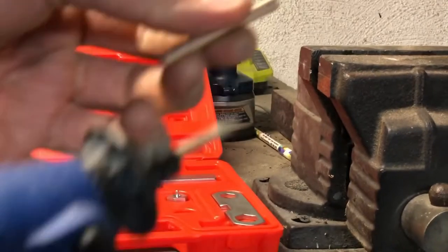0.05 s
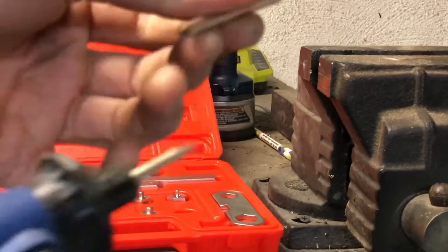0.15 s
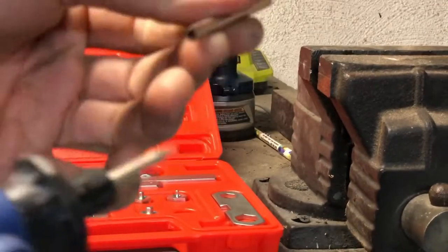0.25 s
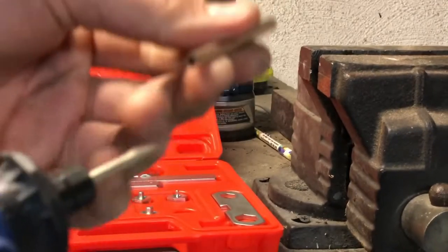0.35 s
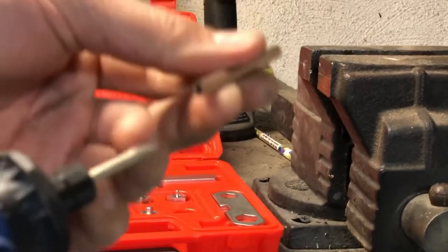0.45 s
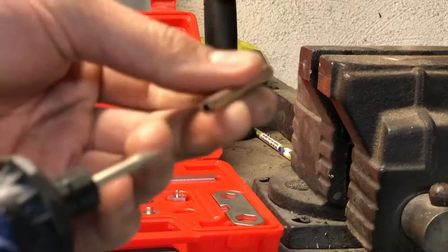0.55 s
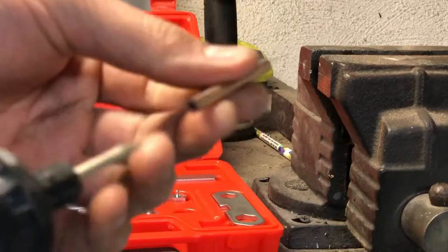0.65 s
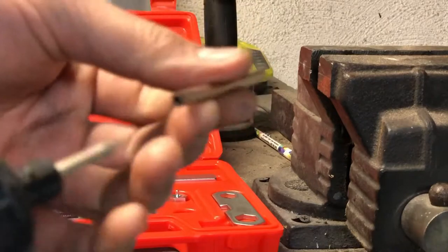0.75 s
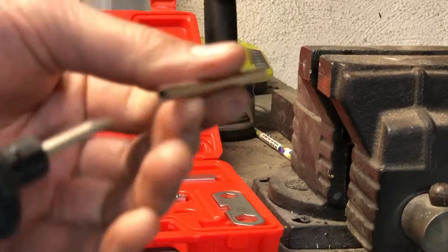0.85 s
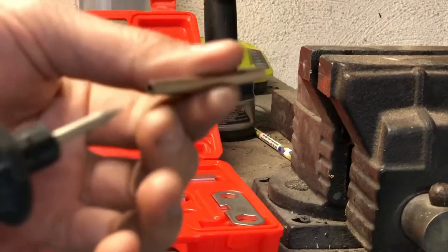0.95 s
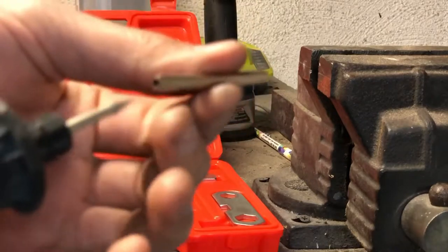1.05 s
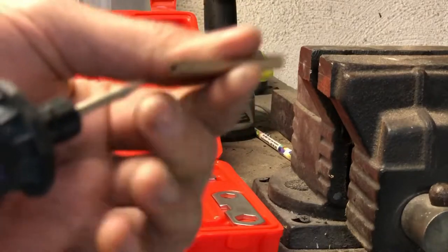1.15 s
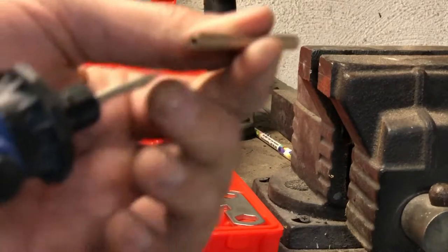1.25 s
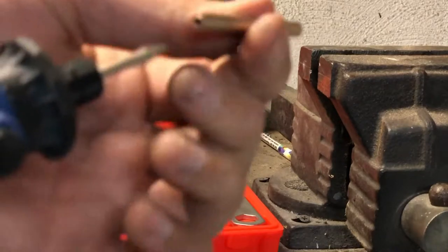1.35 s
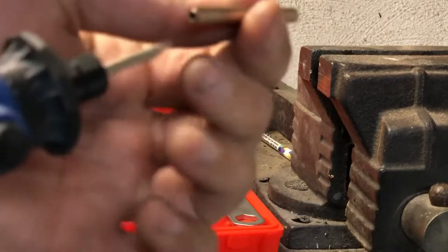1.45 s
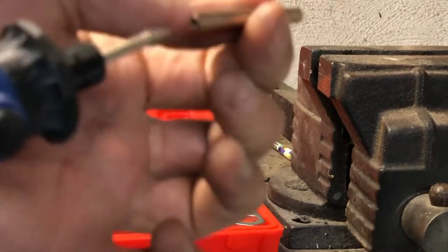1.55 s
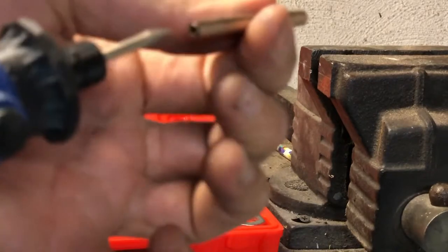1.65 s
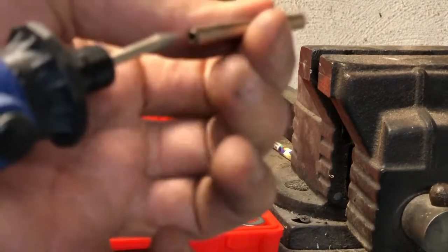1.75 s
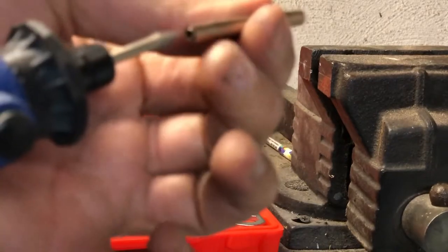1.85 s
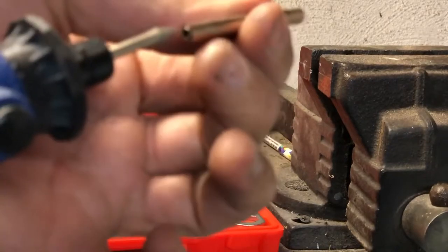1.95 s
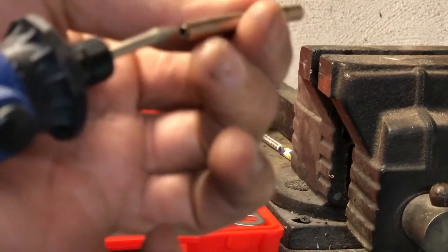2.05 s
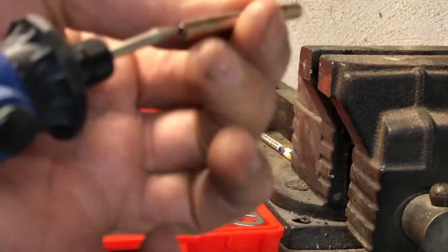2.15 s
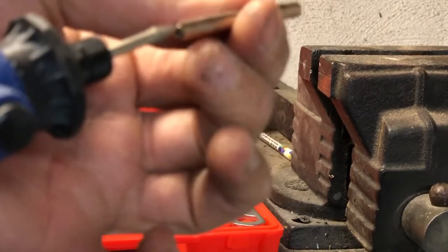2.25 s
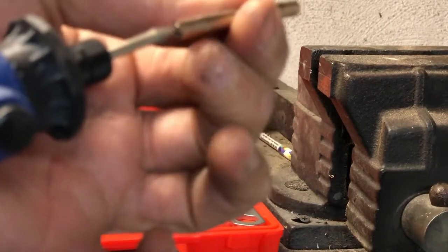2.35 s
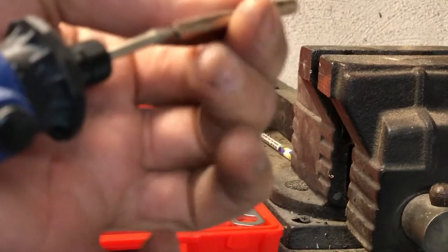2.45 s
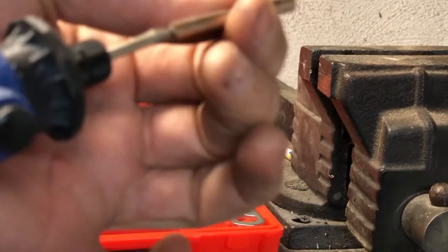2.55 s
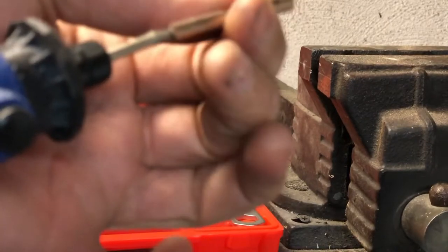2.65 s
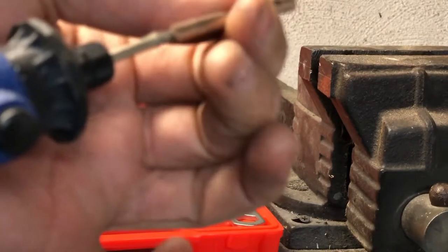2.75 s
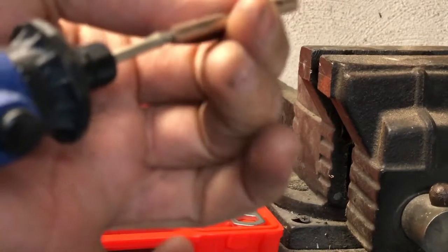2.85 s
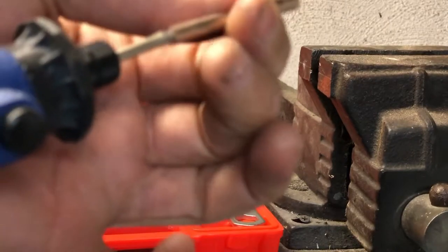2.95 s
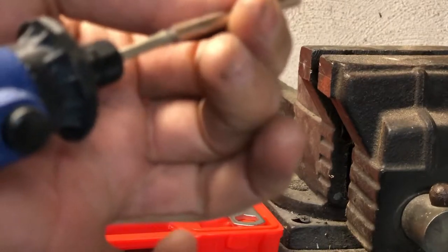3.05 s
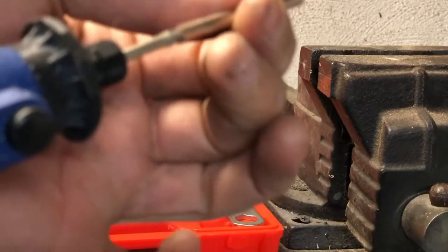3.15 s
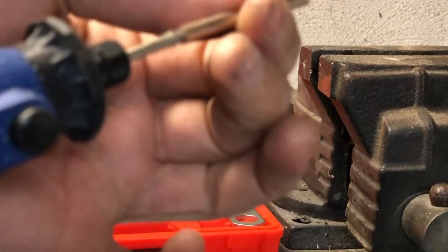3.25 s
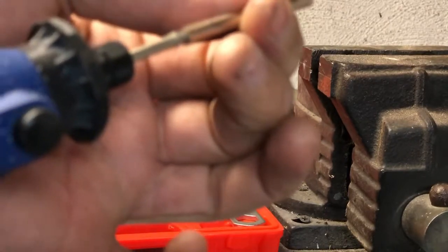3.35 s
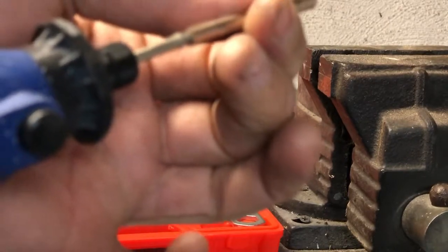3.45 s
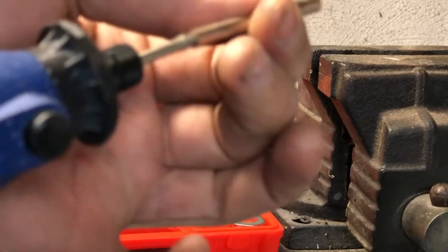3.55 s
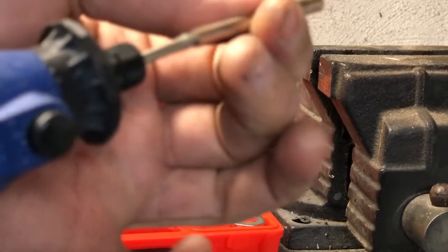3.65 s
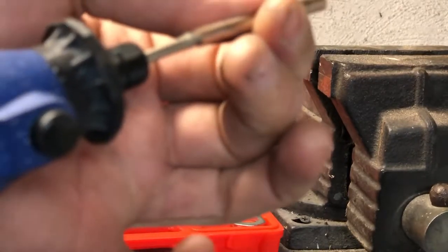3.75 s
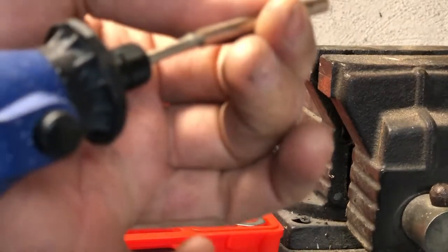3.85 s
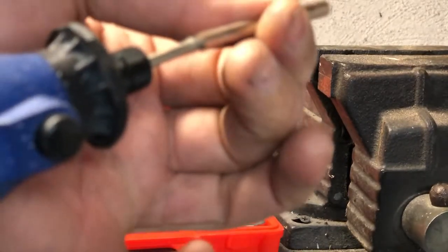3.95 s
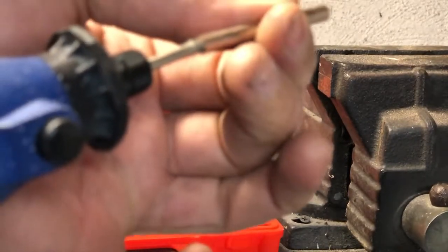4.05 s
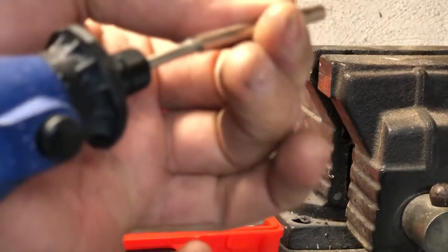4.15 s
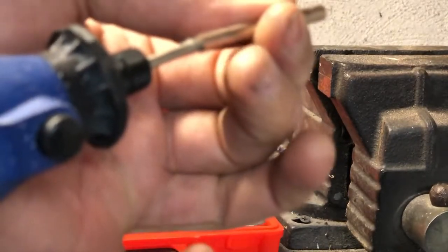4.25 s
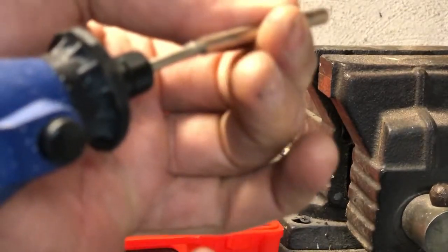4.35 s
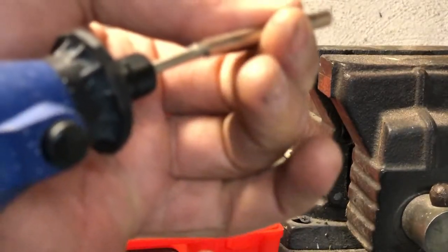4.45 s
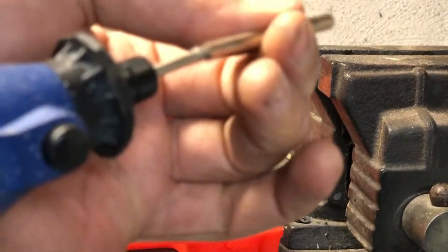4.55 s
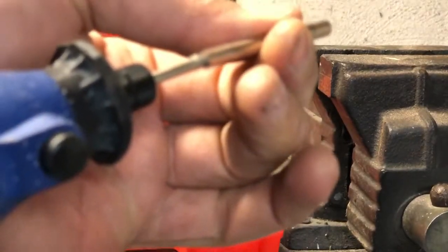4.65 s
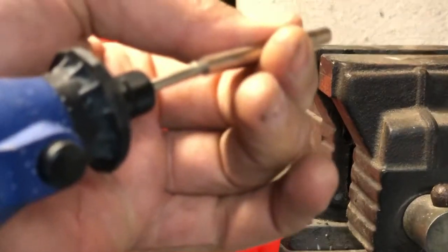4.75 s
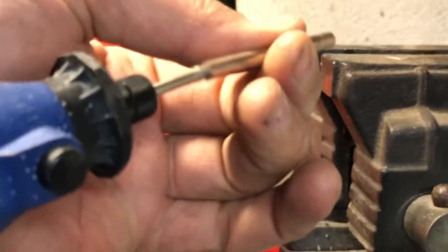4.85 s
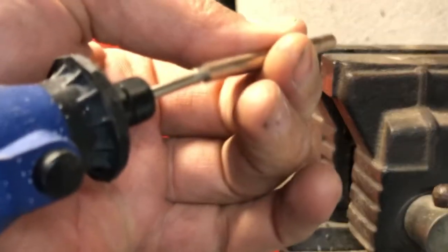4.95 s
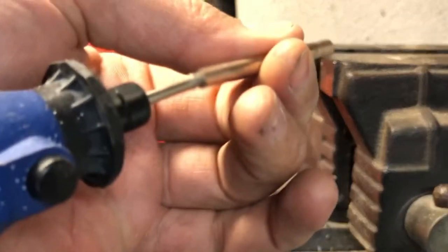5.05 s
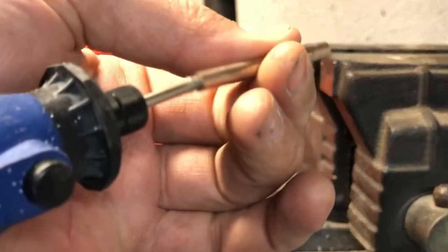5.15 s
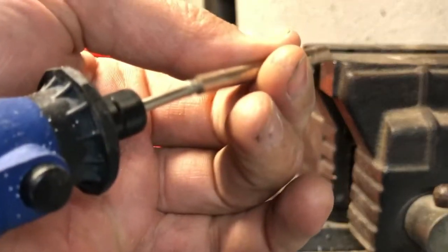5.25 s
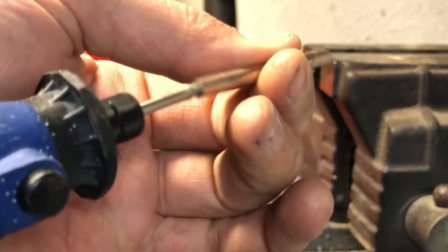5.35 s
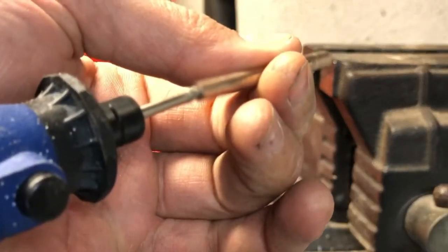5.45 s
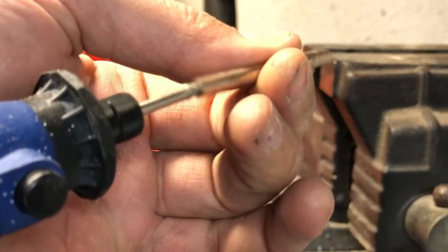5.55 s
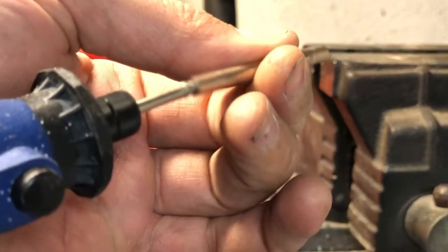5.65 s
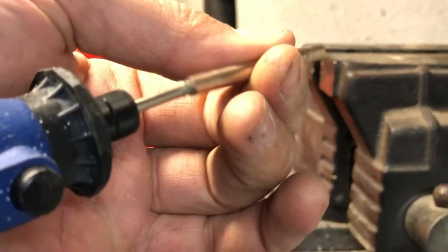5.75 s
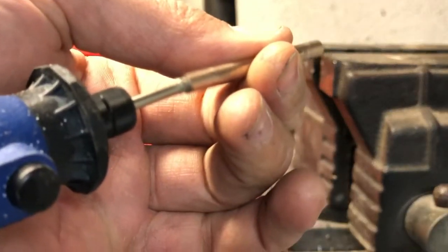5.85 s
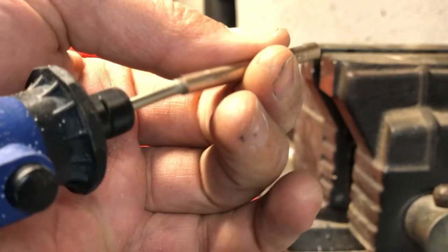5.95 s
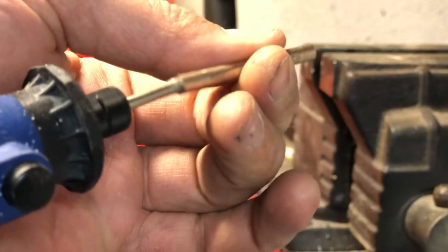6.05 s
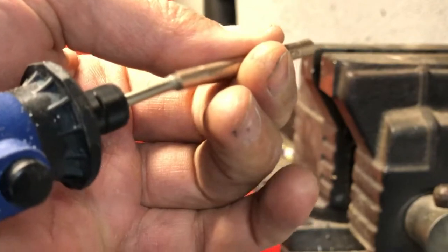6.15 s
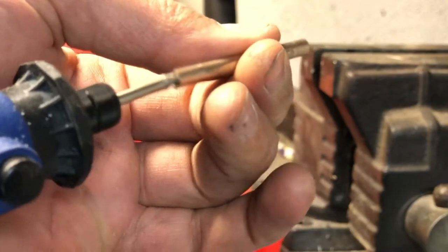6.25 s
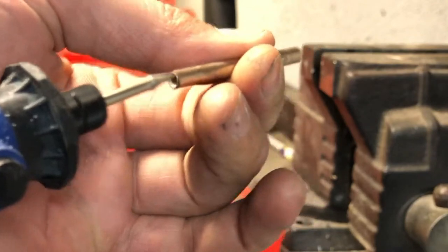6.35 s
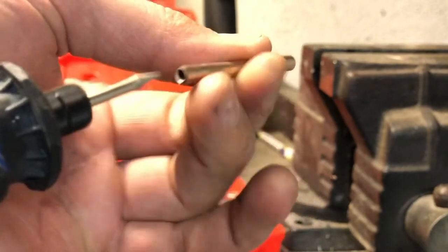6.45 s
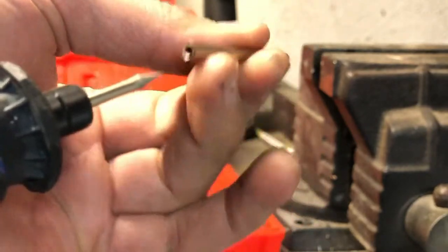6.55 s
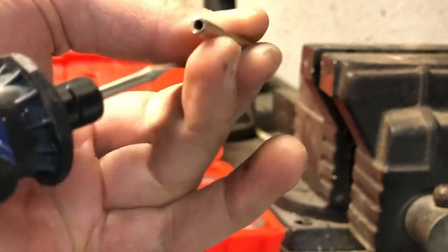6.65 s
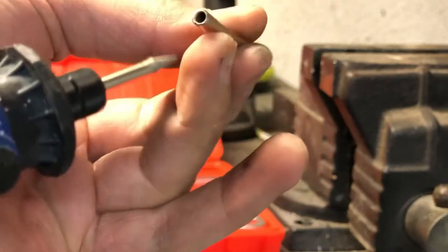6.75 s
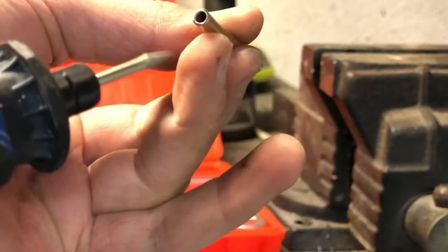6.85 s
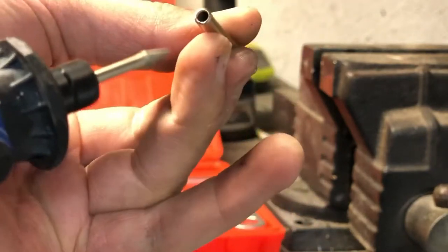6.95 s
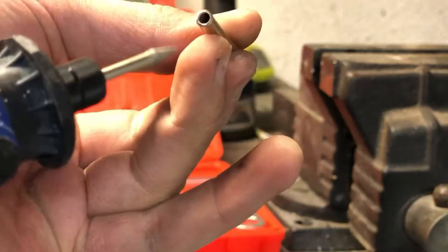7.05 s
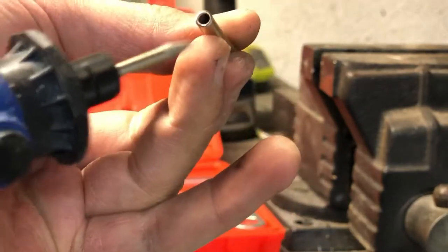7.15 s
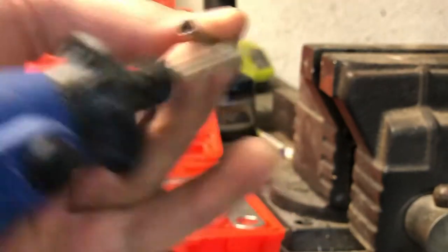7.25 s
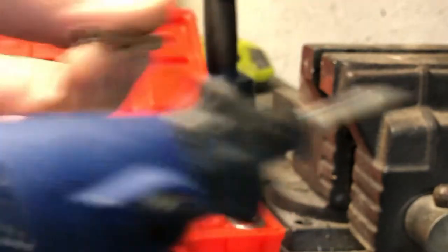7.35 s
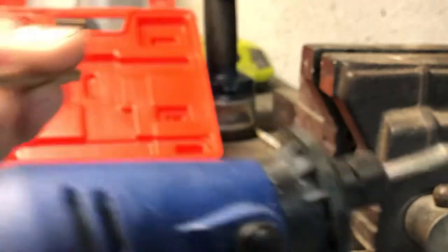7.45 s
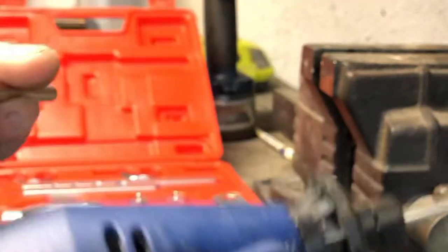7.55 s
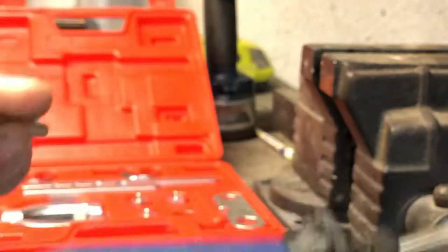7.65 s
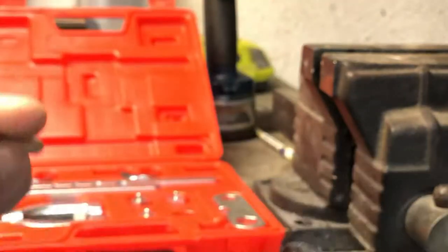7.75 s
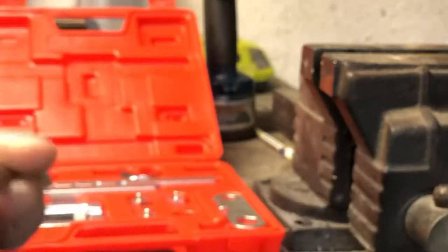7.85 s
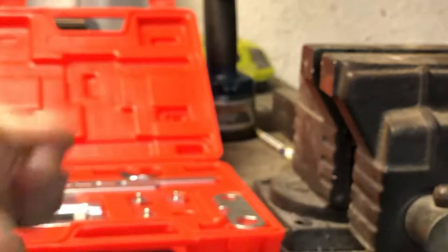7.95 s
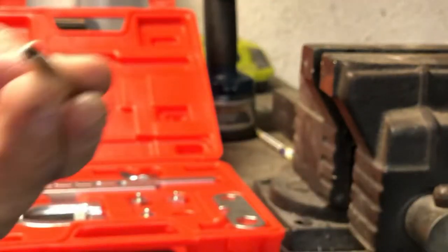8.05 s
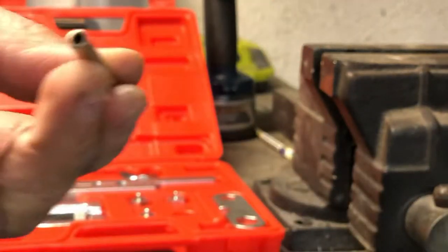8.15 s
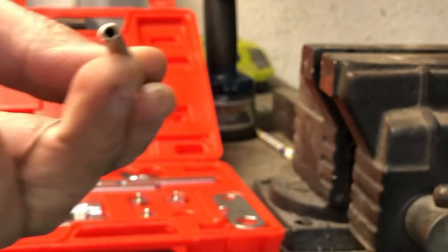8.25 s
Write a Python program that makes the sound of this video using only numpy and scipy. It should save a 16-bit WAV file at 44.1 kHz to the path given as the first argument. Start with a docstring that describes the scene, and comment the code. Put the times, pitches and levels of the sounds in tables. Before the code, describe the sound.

A mains-powered rotary tool runs close to the microphone, whining upward over faint room rumble. Bright metal-on-metal grinding starts softly, becomes loud, rough and tonal while the motor slows, and ends in a warbling high squeal. The burr slips out with fast ticks, leaving the quieter motor accelerating, its ringing tone and airy vent noise changing as it is swung aside.

```python
"""A mains-powered rotary tool spins up over faint room rumble: hum, whine, rushing air and a ringing stator.
At 2.2 s its burr is pushed into a thin hand-held metal tube; tooth noise through the tube's modes gives a rattle,
and overtones of the bounce rate give a pitched chatter as the burr locks and the load drags the motor down.
At 5.8 s it jams with a shrill, warbling squeal, then slips free and ticks on the rim as it is pulled out.
The freed motor winds up again and is swung aside at 7.25 s; gain control and a limiter shape the whole mix."""
import sys
import numpy as np
from scipy import signal
from scipy.fft import rfft, irfft, next_fast_len
from scipy.io import wavfile
from scipy.ndimage import uniform_filter1d, minimum_filter1d

SR = 44100
rng = np.random.default_rng(int(sys.argv[2]) if len(sys.argv) > 2 else 0)


def persist_wave(psi):
    """Save psi, clipped to +-1, as 16-bit WAV."""
    counts = np.round(np.clip(psi, -1, 1) * 32767).astype(np.int16)
    wavfile.write(sys.argv[1], SR, np.atleast_2d(counts).T)


N = 365411
TIME = np.arange(N) / SR
MAINS_PULSE_HZ = 120
JAM_START_S, JAM_END_S = 5.828, 6.128

# each new grip of the burr on the wall: start t/s, bounces per turn (rounded to thirds), lock to the rotation (0-1),
# pitched share (0-1), level/dB at the reference grinding speed, tube ring over that level/dB
GRIPS = [(2.228, 1, 0.53, .05, -24, -8), (2.335, 2, 0.27, 0, -17, -4.5), (2.4, 2, 0.24, 0.2, -16.5, -4),
         (2.45, 2, .1, 0.05, -16.5, -5), (2.83, 2, 0.3, 0.06, -16, -8), (2.865, 7, 0.3, 0.03, -15, -8),
         (2.93, 7, 0.57, .5, -14, -9.5), (2.975, 7, .6, 0.72, -10.5, -8.5), (2.995, 7, .6, 0.3, -20, -11),
         (3.009, 7, .7, .3, -13.5, -8), (3.045, 7, 0.65, 0.73, -12, -8), (3.07, 2.3, .25, 0.47, -12, -7.5),
         (3.117, 3, 0.72, 0.72, -10.5, -4.5), (3.249, 3.333, 0.81, .78, -9.5, -4),
         (3.44, 3.667, 1, 0.69, -9.3, -5.5), (3.519, 4, 1, 0.73, -8, -8), (3.603, 5, 1, 0.78, -7, -1.2),
         (5.198, 3, 0.78, 0.48, -9, -7.5), (5.617, 5, 0.92, 0.63, -5, -8.5),
         (5.788, 6, .85, 0.6, -4.5, -5.5), (5.81, 7, .8, 0.69, -4.5, -7.5), (6.1, 15.5, 0, 0.57, 8.5, -34),
         (6.133, 15.5, 0.28, 0.54, 7, -8)]


def from_db(db):
    """Decibels to gain."""
    return 10 ** (np.asarray(db) / 20)


def rms_one(x):
    """Scale to rms 1."""
    return x / np.sqrt(np.mean(x ** 2) + 1e-20)


def evened(x, seconds=0.079):
    """Hold the running rms at 1, keeping the faster detail."""
    power = np.abs(uniform_filter1d(x * x, max(int(seconds * SR), 3)))
    return x / np.sqrt(power + 1e-12)


def at_hz(points, hz):
    """Read a spectrum on a log-frequency axis."""
    point_hz, level_db = np.transpose(points)
    return np.interp(np.log(hz), np.log(point_hz), level_db)


def drift(rate_hz):
    """Smooth random wander of spread 1: noise through two equal low-pass poles, run at a twentieth of SR."""
    r = np.exp(-40 * np.pi * rate_hz / SR)
    noise = rng.standard_normal(N // 20 + 3002)
    slow = signal.lfilter([1], [1, -2 * r, r * r], noise)[3000:]   # the filter has settled
    return np.interp(np.arange(N) / 20, np.arange(len(slow)), rms_one(slow))


def band(x, low_hz, high_hz, order=3):
    """Butterworth band-pass."""
    edges_hz = [low_hz, min(high_hz, .45 * SR)]
    return signal.sosfilt(signal.butter(order, edges_hz, "band", fs=SR, output="sos"), x)


def resonance(x, hz, width_hz):
    """Two-pole resonance with gain about 1 on top."""
    r = np.exp(-np.pi * width_hz / SR)
    poles = [1, -2 * r * np.cos(2 * np.pi * hz / SR), r * r]
    return signal.lfilter(np.array([1, 0, -1]) * (1 - r * r) / 2, poles, x)


def coloured_noise(spectrum):
    """Noise of the given spectrum, rms 1."""
    size = next_fast_len(N)
    hz = np.maximum(np.fft.rfftfreq(size, 1 / SR), 1)
    bins = rfft(rng.standard_normal(size)) * from_db(at_hz(spectrum, hz))
    return rms_one(irfft(bins, size)[:N])


def once_per_turn(turns, count, wear_rate):
    """A random profile round the shaft with count ripples at most, met again on every turn and slowly wearing."""
    out, angle = 0, np.linspace(0, 1, 2048, endpoint=False)   # angle in turns
    for _ in range(3):   # three profiles drift in and out
        size = rng.rayleigh(1, count) ** .5
        phase = np.exp(2j * np.pi * rng.random(count))
        profile = irfft(np.r_[0, size * phase], len(angle))
        out = out + drift(wear_rate) * np.interp(turns % 1, angle, profile)
    return evened(out)


def since(start_s):
    """Seconds since a moment, 0 before it."""
    return np.maximum(TIME - start_s, 0)


def between(start_s, end_s, ramp_s):
    """1 from start to end and 0 outside, with ramps centred on both."""
    return np.clip(np.minimum(TIME - start_s, end_s - TIME) / ramp_s + .5, 0, 1)


def glide(x, seconds):
    """Turn steps into ramps."""
    return uniform_filter1d(x, max(int(seconds * SR), 1))


def workshop():
    """Faint rumble and mains hum."""
    room_db = -55
    # f/Hz, relative level/dB
    rumble = coloured_noise([(20, -16), (45, 0), (80, -3), (200, 2.5), (600, 0), (4000, -51)])
    hum = 0.41 * np.sin(2 * np.pi * MAINS_PULSE_HZ * TIME)
    return from_db(room_db) * (rumble + hum)


def shaft_speed():
    """The free motor winds up towards its top speed; in the tube the load sets the pace."""
    # free run-ups: start t/s, speed at the start/turns per s, speed it heads for/turns per s,
    # lag/s (after one lag a quarter of the gap is left)
    run_ups = [(0, 185.5, 339.7, 1.945), (6.15, 161.6, 375.7, 2.01)]
    # the shaft under load: t/s, speed/turns per s
    loaded_speed = [(2.3, 307), (2.85, 305.4), (3.03, 294.1), (3.33, 270), (3.56, 252.8), (3.72, 229.8),
                    (3.83, 221.2), (4.1, 208.8), (4.26, 201.8), (4.63, 201.6), (4.81, 186.9), (4.92, 194.4),
                    (5.15, 201), (5.25, 196), (5.56, 203.5), (5.65, 217.1), (5.83, 203), (5.92, 185),
                    (6.15, 161.6)]
    speed = np.zeros(N)
    for start_s, first, top, lag_s in run_ups:
        free = top - (top - first) / (1 + since(start_s) / lag_s) ** 2
        speed = np.where(TIME >= start_s, free, speed)
    loaded = (TIME > loaded_speed[0][0]) & (TIME < loaded_speed[-1][0])
    return np.where(loaded, np.interp(TIME, *np.transpose(loaded_speed)), speed)


def whine(speed, angle):
    """Fan blades and commutator sound multiples of the shaft speed, each fluttering in level."""
    # strong multiples: multiple of the shaft speed, level over the other multiples/dB
    motor_orders = [(2, 9), (4, 5.5), (12, 4), (13, 5.5), (15, 6), (16, 15.5), (17, 4), (18, 13), (20, 7.5),
                    (25, 6), (28, 5), (29, 5), (30, 7), (32, 2), (33, 8.5), (37, 7.5), (41, 2.5), (45, 8.5)]
    # colour of one multiple: f/Hz, relative level/dB
    whine_colour = [(400, -28), (560, -27.5), (660, -9.5), (780, -18.5), (1050, -15.5), (1800, -14.5),
                    (3300, -17.5), (5500, -16), (7000, -10.5), (8600, -8.5), (10500, -16), (13500, -39),
                    (15500, -21)]
    flutter_db = 2.8
    out, strong = np.zeros(N), dict(motor_orders)
    coarse = np.arange(0, N, 64)   # levels move slowly: one value per 64 samples
    for k in range(2, 60):
        flutter = rms_one(signal.lfilter([1], [1, -.99], rng.standard_normal(len(coarse))))
        level_db = at_hz(whine_colour, k * speed[coarse]) + strong.get(k, 0) + flutter_db * flutter
        tone = np.sin(k * angle + rng.uniform(0, 2 * np.pi))
        out += np.interp(np.arange(N), coarse, from_db(level_db)) * tone
    return out


def rushing_air(current):
    """Coloured noise of the air, pulsing with the supply current."""
    # f/Hz, relative level per Hz/dB
    air_colour = [(120, -24.5), (400, -12), (750, -6), (1000, -1), (1350, -6.5), (2000, -5.5), (2600, -2.5),
                  (3400, -8), (5500, -4.5), (7200, -1), (8800, -2), (11000, -6), (13000, -4), (16000, -18)]
    return coloured_noise(air_colour) * rms_one(1 + .5 * current)


def stator_ring(angle, current):
    """Current pulses pull on the passing eight slots and ring one resonance of the stator."""
    slots = np.sin(8 * angle) + .12 * np.sin(9 * angle) + .12 * np.sin(10 * angle)
    pull = (current + 0.0035) * (slots + 0.2 * rng.standard_normal(N))
    return resonance(pull, hz=2404, width_hz=97)


def motor(speed, turns):
    """Rotor hum, whine, air and stator, each growing with speed; swung aside, the vents face the microphone."""
    reference_speed = 300   # turns per s, where the layer levels below hold
    hum_db, hum_db_per_octave = -38.5, 17   # per octave of shaft speed
    whine_db, whine_db_per_octave = -30, 11.5
    air_db, air_db_per_octave = -27, 11
    stator_db, stator_db_per_octave = -5, 11
    aside_s, swing_s = 7.25, 0.18
    aside_whine_db, aside_stator_db, aside_vent_db = -3.5, 7, -5.5
    octaves = np.log2(speed / reference_speed)
    aside = np.clip((TIME - aside_s) / swing_s + .5, 0, 1)
    angle = 2 * np.pi * turns
    current = np.exp(-(TIME * MAINS_PULSE_HZ % 1) / 0.13)   # the speed control fires once per mains half-cycle
    hum = from_db(hum_db + hum_db_per_octave * octaves) * np.sqrt(2) * np.sin(angle)
    whine_gain = from_db(whine_db + whine_db_per_octave * octaves + aside_whine_db * aside)
    air = from_db(air_db + air_db_per_octave * octaves) * rushing_air(current)
    air += aside * from_db(aside_vent_db) * resonance(air, hz=934, width_hz=290)
    stator_gain = from_db(stator_db + stator_db_per_octave * octaves + aside_stator_db * aside)
    return hum + whine_gain * whine(speed, angle) + air + stator_gain * stator_ring(angle, current)


def grips():
    """Each grip holds until the next: bounces per turn, lock, pitched share, level and ring."""
    glide_s, level_glide_s = .02, 0.007   # from one grip to the next
    bite_db, bite_s = 6.5, 0.49   # a fresh grip rings harder, then wears in
    skid_share, skid_s = .5, 0.014   # and loses part of its lock for a moment
    start_s, per_turn, lock, pure, level_db, ring_db = np.transpose(GRIPS)
    row = np.maximum(np.searchsorted(start_s, TIME, side="right") - 1, 0)
    age_s = np.abs(TIME - start_s[row])
    per_turn = np.round(3 * per_turn) / 3   # the bounce pattern closes within three turns
    lock = lock[row] * (1 - skid_share * np.exp(-age_s / skid_s))
    lock = np.clip(glide(lock, level_glide_s), 0, 1)
    pure = np.clip(glide(pure[row], level_glide_s), 0, 1)
    level_db = glide(level_db[row], level_glide_s)
    ring_db = glide(ring_db[row] + bite_db * np.exp(-age_s / bite_s), level_glide_s)
    return glide(per_turn[row], glide_s), lock, pure, level_db, ring_db


def tube_ring(force):
    """The tube's modes colour the force; their powers add, with steep skirts and dark valleys between."""
    # modes of tube and shank: f/Hz, width at half amplitude/Hz, relative level/dB
    tube_modes = [(1570, 970, -0.5), (2250, 1130, 1), (2460, 560, 0), (3740, 710, 2), (4315, 540, 1.5),
                  (4710, 210, -4.5), (6264, 1370, 0), (7440, 940, -2.5), (8450, 2000, -4),
                  (10500, 1250, -2), (12200, 3200, 1), (15300, 4000, -9)]
    size = next_fast_len(N + 2048)
    freq = np.fft.rfftfreq(size, 1 / SR)
    power = sum((from_db(db) / (1 + (2 * (freq - hz) / width) ** 2)) ** 2 for hz, width, db in tube_modes)
    return irfft(rfft(force, size) * np.sqrt(power), size)[:N]


def tooth_noise(turns, bounces, bounce_hz, lock):
    """Each bounce drags the teeth over the wall; locked bounces meet the same teeth on every turn."""
    loose = 1 - lock
    since_hit = bounces % 1 / bounce_hz
    # a loose burr hits unevenly, and hardest on the high side of its runout
    unevenness_db = loose * (2.7 * drift(110) + 1.8 * np.cos(2 * np.pi * turns))
    pressure = (np.exp(-since_hit / 0.00046) + 0.19) * from_db(unevenness_db)
    twisted = turns + 0.0039 * drift(55)   # the thin shank twists, blurring the highest lines
    same_teeth = np.sqrt(lock) * once_per_turn(twisted, count=90, wear_rate=2.64)
    chance_teeth = np.sqrt(loose) * rng.standard_normal(N)
    return pressure * (same_teeth + chance_teeth)


def chatter(turns, angle, lock):
    """The train of blows itself gives pitched overtones of the bounce rate."""
    # multiple of the bounce rate, relative level/dB
    blow_overtones = [(2, -2.5), (3, 1.5), (4, -4), (5, -1.5), (6, -4.5), (7, 0)]
    # where the chatter cannot settle, it hunts back and forth:
    # start t/s, end t/s, beat f/Hz, swing of the bounce phase/rad
    chatter_hunts = [(3.282, 3.445, 90, 0.17), (5.218, 5.603, 28, .33)]
    # uneven spacing makes the upper overtones beat
    limp = (0.061 + 0.14 * (1 - lock)) * once_per_turn(turns, count=2, wear_rate=2.7)
    hunt = np.zeros(N)
    for start_s, end_s, beat_hz, swing in chatter_hunts:
        hunt += swing * between(start_s, end_s, 0.034) * np.sin(2 * np.pi * beat_hz * since(start_s))
    phase = angle + limp + hunt
    overtones = sum(from_db(db + 2.8 * drift(6.3)) * np.sin(round(k) * phase) for k, db in blow_overtones)
    return overtones * (1 + 1.6 * hunt)   # the blows throb as the chatter hunts


def blend(first, second, share):
    """Cross-fade two sounds at constant power."""
    share = np.clip(share, 0, .998)
    return np.sqrt(1 - share) * evened(first) + np.sqrt(share) * evened(second)


def grinding(speed, turns):
    """The bouncing burr rattles and chatters in the tube, with scrape and grit on top."""
    reference_speed, db_per_octave = 250, 13.5   # turns per s; faster teeth hit harder than at that speed
    grit_db, grit_lock_db = -11, 9.5   # the top treble, and what a full lock adds to it
    shake_db = 2   # the whole tube shaken at the bounce rate
    waver_db = 1   # a loose burr presses unsteadily
    slip_s, slip_decay_s, leave_s = 6.125, .034, 6.297
    per_turn, lock, pure, level_db, ring_db = grips()
    loose = 1 - lock
    # slipping free, the bounces die away to one tick a turn until the burr leaves the rim
    slip = np.maximum(np.exp(-since(slip_s) / slip_decay_s), 1 / per_turn)
    bounce_hz = slip * per_turn * speed
    bounces = np.cumsum(bounce_hz) / SR + loose ** 2 * 0.13 * drift(160)
    angle = 2 * np.pi * bounces
    rattle = tube_ring(tooth_noise(turns, bounces, bounce_hz, lock))
    overtones = chatter(turns, angle, lock)
    pitched = band(tube_ring(overtones) + 0.3 * overtones, 860, 5640)
    ring = from_db(ring_db) * blend(band(rattle, 660, 4700), pitched, pure)
    scrape = evened(band(rattle, 4990, 9740, order=4))
    grit = from_db(grit_db + grit_lock_db * lock) * evened(band(rattle, 10560, 17200, order=4))
    shake = from_db(shake_db) * pure ** 2 * band(np.sqrt(2) * np.sin(angle), 560, 3800, order=2)
    # silent during the jam
    touching = between(GRIPS[0][0], JAM_START_S, 0.016) + between(JAM_END_S - .016, leave_s, .01)
    speed_db = db_per_octave * np.log2(speed / reference_speed)
    strength = touching * slip * from_db(level_db + speed_db + waver_db * loose * drift(18))
    return strength * (shake + ring + scrape + grit)


def squeal(turns, pitch_hz, swing_hz=480, scatter_hz=230, grip_db=7):
    """The rubbing shank sings; its pitch and grip swing through every turn."""
    hz = pitch_hz + swing_hz * once_per_turn(turns, count=6, wear_rate=5.4) + scatter_hz * drift(474)
    grip = from_db(grip_db * once_per_turn(turns, count=3, wear_rate=8))
    tone = np.sin(2 * np.pi * np.cumsum(hz) / SR)
    return band(np.tanh(0.47 * grip) * tone, 7000, 13000, order=5)


def jam(speed, turns):
    """The jammed burr squeals; it rubs ever harder, and only a few resonances of the shank keep ringing."""
    squeal_db, squeal_hz, sag_hz_per_octave = 5.5, 11730, 3675   # lower as the shaft slows
    rub_db, rub_db_per_s, shank_db, shudder_db = -16, 35, -27.5, -36.5
    attack_s = 0.051
    held_s = np.minimum(since(JAM_START_S), JAM_END_S - JAM_START_S)
    start_speed = np.interp(JAM_START_S, TIME, speed)
    pitch_hz = squeal_hz + sag_hz_per_octave * np.log2(speed / start_speed)
    force_db = 3.7 * once_per_turn(turns, count=3, wear_rate=7) + 2 * drift(23)
    force = rng.standard_normal(N) * from_db(force_db)
    singing = from_db(squeal_db) * evened(squeal(turns, pitch_hz))
    rub = from_db(rub_db + rub_db_per_s * held_s) * evened(band(tube_ring(force), 5800, 7760))
    shank = from_db(shank_db) * evened(resonance(force, 2710, 220) + 0.65 * resonance(force, 3900, 400))
    shudder = from_db(shudder_db) * evened(band(force, 120, 470, order=2))   # the tube judders in the hand
    swell = np.minimum(0.19 + held_s / attack_s, 1)
    return between(JAM_START_S, JAM_END_S, 0.0056) * swell * (singing + rub + shank + shudder)


def scene():
    """One shaft drives tool and burr; the pulsing supply ripples its speed a little."""
    ripple = .0007 * drift(15.87) + 0.0034 * np.sin(2 * np.pi * MAINS_PULSE_HZ * TIME)
    speed = shaft_speed() * (1 + ripple)
    turns = np.cumsum(speed) / SR
    sound = workshop() + motor(speed, turns) + grinding(speed, turns) + jam(speed, turns)
    return np.array([sound, sound])


def gain_control(x):
    """Loud sound soon turns the gain down; it creeps back at a steady rate in dB."""
    threshold_db, cut_per_db_over = -14, 0.74
    detector_s, recovery_db_per_s = 0.029, 5
    r = np.exp(-1 / (detector_s * SR))
    power = signal.lfilter([1 - r], [1, -r], np.mean(x ** 2, axis=0))
    level_db = 10 * np.log10(power + 1e-12)
    wanted_db = cut_per_db_over * np.maximum(level_db - threshold_db, 0)
    recovered_db = recovery_db_per_s * TIME
    cut_db = np.maximum.accumulate(wanted_db + recovered_db) - recovered_db   # the deepest cut, less its recovery
    return x * from_db(-cut_db)


def record(dry):
    """Gain control, then a fast limiter that holds the peaks under full scale; the top is cut."""
    cutoff_hz = 15900
    held = gain_control(dry)
    allowed = np.minimum(1, .85 / (np.abs(held) + 1e-9))
    gain = uniform_filter1d(minimum_filter1d(allowed, size=257), size=129)   # samples
    return signal.sosfilt(signal.ellip(12, .1, 90, cutoff_hz, fs=SR, output="sos"), gain * held)


dry = scene()
out = record(dry)
persist_wave(out)
```